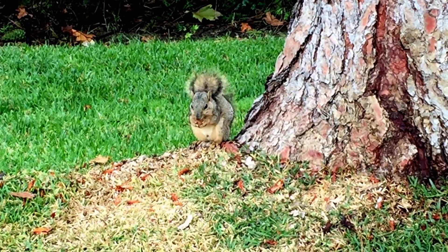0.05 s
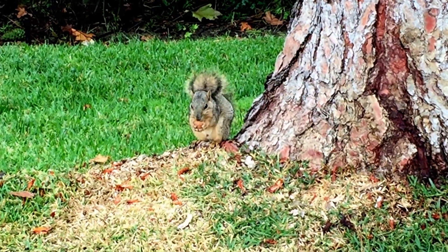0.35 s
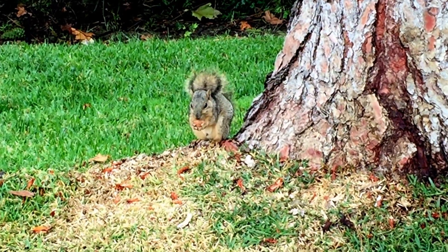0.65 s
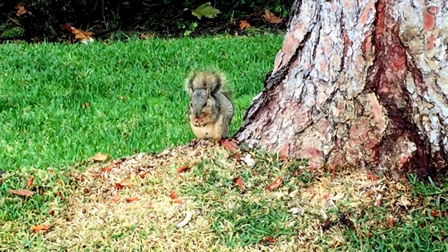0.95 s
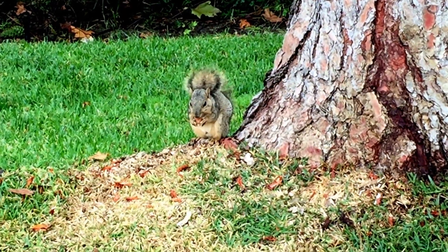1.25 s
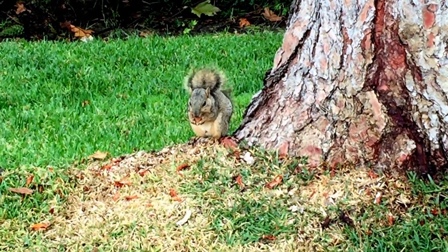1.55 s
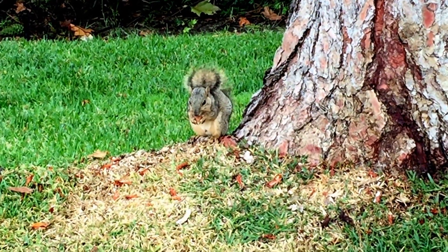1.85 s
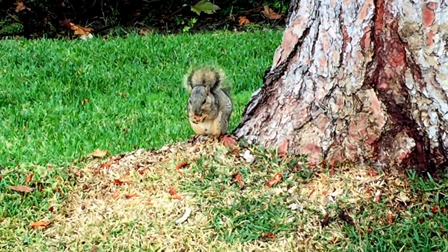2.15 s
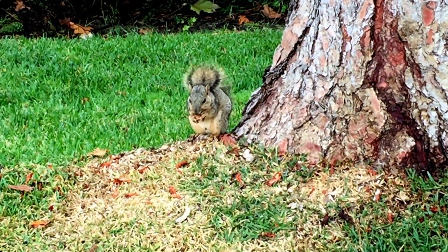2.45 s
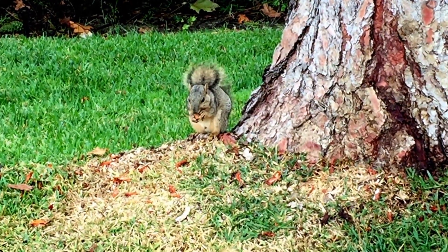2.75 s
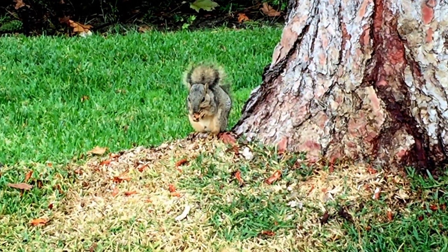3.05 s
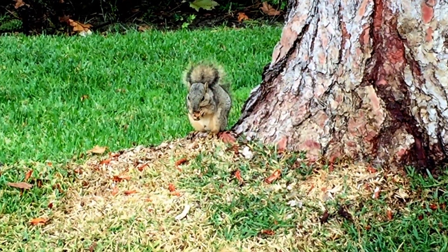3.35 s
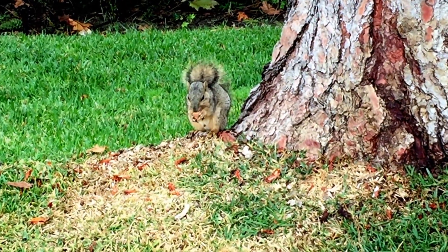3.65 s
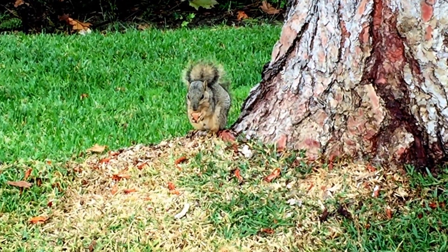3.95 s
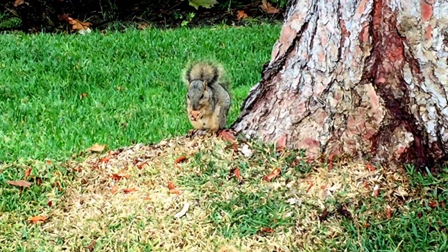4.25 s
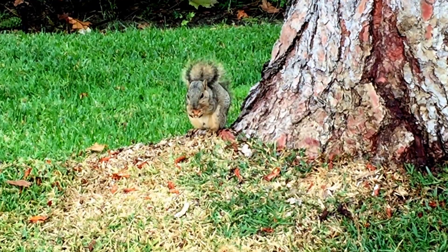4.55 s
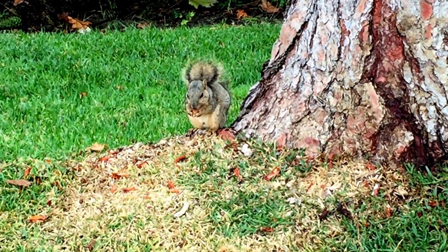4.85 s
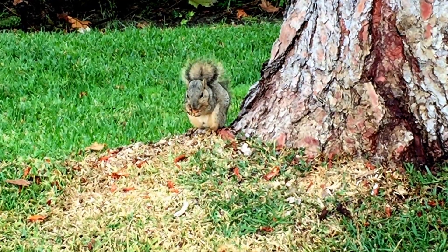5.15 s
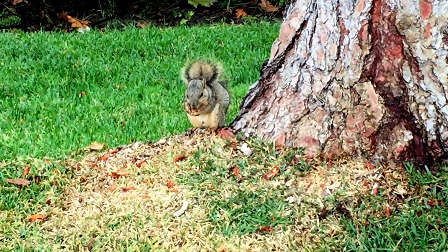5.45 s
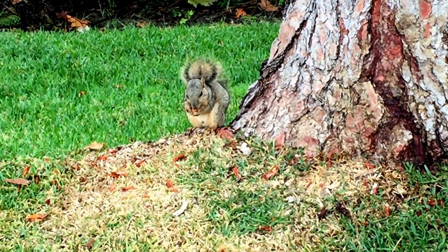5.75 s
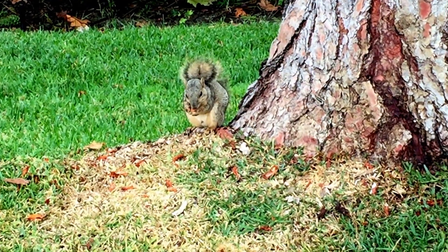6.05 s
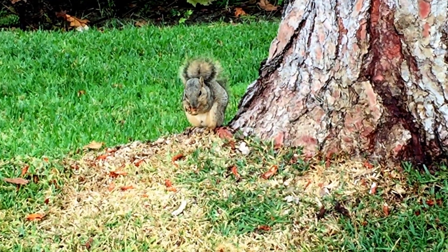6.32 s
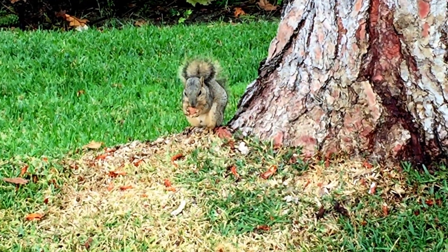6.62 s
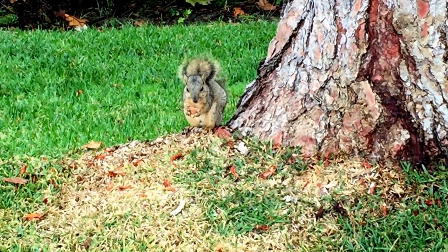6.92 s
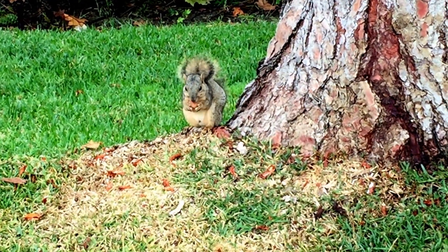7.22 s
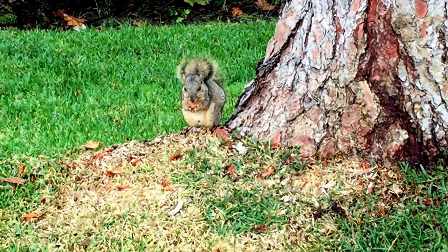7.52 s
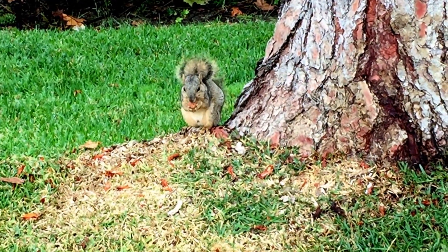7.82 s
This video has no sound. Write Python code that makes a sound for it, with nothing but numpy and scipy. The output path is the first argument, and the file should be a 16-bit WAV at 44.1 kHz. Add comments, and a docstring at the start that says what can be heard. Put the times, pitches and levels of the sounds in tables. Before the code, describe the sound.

Faint, scattered cracks of a squirrel's teeth on a nut shell sit over a soft outdoor wash of faraway traffic. An engine hum rises in pitch, fading in and out, joined about halfway by a very deep engine changing gear. Tyre roar and hiss grow steadily as the vehicle comes along the street, some way from the microphone, and it is nearest at the very end.

```python
"""Squirrel gnawing near a street

A squirrel gnaws on a lawn while distant traffic rumbles and a deep engine works through its gears.
A vehicle speeds up along the street: its engine note climbs, then its tyres swell into a rush as it
comes closer, coloured by sound bouncing off the ground. Now and then the squirrel's teeth crack
a nut, and the shell rings for an instant."""
import sys
import numpy as np
from scipy import signal
from scipy.fft import rfft, irfft
from scipy.io import wavfile
from scipy.ndimage import uniform_filter1d

SR = 44100
rng = np.random.default_rng(int(sys.argv[2]) if len(sys.argv) > 2 else 0)


def persist_wave(psi):
    """Save psi, clipped to +-1, as 16-bit WAV."""
    counts = np.round(np.clip(psi, -1, 1) * 32767).astype(np.int16)
    wavfile.write(sys.argv[1], SR, np.atleast_2d(counts).T)


N = 356328
TIME = np.arange(N) / SR

# A "colour" says how strong the low and high parts of a noise are compared with each other.
# colours of the far traffic and of the street's rumble (frequency [Hz], relative level [dB])
TRAFFIC_COLOUR = [(60, -30), (110, -2), (200, -5.5), (300, -12), (420, -16), (750, -15.5), (1030, -13.5),
                  (1350, -21), (1750, -28), (2300, -34.5), (3200, -37), (4100, -35), (6000, -39),
                  (12000, -40.5), (15800, -43)]
RUMBLE_COLOUR = [(10, -33), (22, -14), (32, -4.5), (44, -5), (56, -3), (80, -6), (105, -7), (150, -26.5),
                 (250, -60.5)]
# how loud the rumble is (time [s], level [dB])
RUMBLE_LEVEL = [(0, -51.5), (1.3, -51.5), (2.05, -48), (2.6, -52), (3.3, -51.5), (3.9, -53), (5.4, -50.5),
                (8.08, -51)]
# a deep engine working through its gears (time [s], pitch [Hz], level [dB])
DEEP_ENGINE = [(4.2, 35, -78), (4.75, 42.87, -55), (5.1, 55.4, -51), (5.55, 52.7, -49.5),
               (6.15, 44.35, -66), (6.48, 55.37, -46.5), (6.8, 61.9, -54), (7.1, 68.2, -50.5),
               (8.08, 85, -59.5)]
# the vehicle's roar when far, approaching and close (frequency [Hz], relative level [dB])
ROAR_FAR = [(80, -7), (160, 1.5), (300, -2.5), (400, -6), (500, -5), (600, -12.5), (780, -5.5),
            (1080, -2.5), (1400, -12), (1750, -11.5), (2200, -23.5), (2600, -23.5), (3500, -43)]
ROAR_APPROACHING = [(80, -11.5), (160, -3.5), (300, -7), (400, -6), (500, -8), (600, -6), (780, -6.5),
                    (1080, -12.5), (1400, -18.5), (1750, -20), (2200, -26.5), (2600, -37), (3500, -55.5)]
ROAR_CLOSE = [(80, -12.5), (160, 0.5), (300, -5), (400, -2.5), (500, -6.5), (600, -7), (780, -3.5),
              (1080, -9.5), (1400, -11.5), (1750, -13.5), (2200, -24), (2600, -37), (3500, -37.5)]
# colour of the tyre hiss (frequency [Hz], relative level [dB])
HISS_COLOUR = [(1200, -9.5), (1800, -2), (2600, -3), (3000, 0.5), (3500, -0.5), (4500, -0.5), (5150, -3),
               (5600, -8), (7400, -5.5), (8500, -7), (9600, -7.5), (10900, -10.5), (13600, -13.5),
               (16000, -15)]
# swells and dips of the hiss, on top of the effect of distance (time [s], level change [dB])
HISS_SWELL = [(2, -4.5), (3, 0), (4.7, -1.5), (5.05, 2.5), (5.5, 4.4), (6.3, -1.7), (6.55, 2), (7.25, 1),
              (7.7, -2.4), (8.08, -0.5)]
# the bounce off the ground (time [s], gap between boosted frequencies [Hz], strength [0-1])
GROUND_BOUNCE = [(5.2, 4140, 0.4), (6.8, 4050, 0.3), (7.5, 4190, 0.3), (8.08, 4450, .34)]
# notes sung by the tyre tread (loudest time [s], half length [s], pitch [Hz], level [dB])
TREAD_NOTES = [(5.85, 0.5, 500, -63), (6.1, 0.59, 216.7, -59), (6.55, 0.57, 458.7, -57),
               (7.1, .3, 504.8, -60)]
# how fast the vehicle's engine fires (time [s], firing rate [Hz])
FIRING_RATE = [(2.2, 85.1), (3.5, 105.5), (4.1, 119.5), (6.5, 168.3), (7.15, 175.4), (7.6, 170)]
# how loud its exhaust note and the octave above are (time [s], level [dB])
EXHAUST_LEVEL = [(2.3, -77), (2.95, -48), (3.08, -59.5), (3.22, -47.5), (3.5, -47.5), (3.6, -53),
                 (3.72, -39), (3.83, -53), (3.92, -40), (4.1, -39.5), (4.4, -59.5), (5.8, -64.5),
                 (6.6, -51), (6.9, -56), (7.15, -49.5), (7.55, -65)]
OCTAVE_LEVEL = [(2.5, -77), (3.45, -59.5), (3.88, -67.5), (4.1, -51), (4.25, -73), (8.08, -70)]
# tones of the engine's drone (pitch [Hz], relative level [dB])
DRONE_TONES = [(122.5, 1.5), (214, -2.5)]
# tones the nut shell rings with (pitch [Hz], relative level [dB], time to fade by 60 dB [s])
SHELL_TONES = [(2389, -5, 0.0046), (4920, 6.5, .003), (5400, -4, 0.0054), (10200, -4, 0.0023),
               (12400, -12, .002), (13600, 0, 0.0033), (14900, -9, 0.0028)]
# cracks made by the teeth (time [s], peak level [dB], boost of the high tones [dB],
# pitch of the lower tones [factor], relative level of the splintering [dB])
CRACKS = [(.0503, -56, -6, 1.2, -9), (.0943, -57, -11, .56, -7), (1.8624, -54, 5, 1.25, -10),
          (1.866, -44.5, 12, 1.17, -4), (2.0134, -41.5, 9.5, 0.98, -11), (2.544, -48, -4, 0.35, -3),
          (2.5658, -54, -5, 0.9, -6), (2.582, -53, 0, 0.42, -3), (2.916, -55.5, -10, 1, -9),
          (3.0563, -52.5, 8, 0.79, -5), (3.061, -56, -8, 1.1, -9), (3.2143, -40.5, -8, 1.2, -10),
          (3.2201, -41, -16, 1.03, -8), (3.223, -51, -14, 0.66, -2), (3.526, -46, 3, 1, -6),
          (3.5323, -55, -12, .95, -3), (5.7335, -43, -23, .8, -9), (6.5081, -35.5, 12, 1.04, -20)]

# the vehicle's path: when it is nearest, how far away the street is, and a steady speed
NEAREST_S, STREET_M, SPEED_M_PER_S = 7.746, 16.15, 9.77


def gain_of(db):
    """Turns decibels into a number to multiply a sound by."""
    return 10 ** (np.asarray(db) / 20)


def evened(x):
    """Scales a signal so that its average size (rms) is 1."""
    return x / np.sqrt(np.mean(x ** 2) + 1e-20)


def colour_at(points, hz):
    """Looks up a colour in dB, joining its points with straight lines on an octave scale."""
    frequencies, db = np.transpose(points)
    return np.interp(np.log(hz + 1), np.log(frequencies + 1), db)


def follow(rows, t=TIME):
    """Looks up each column of a timed table at the times t."""
    times, *columns = np.transpose(rows)
    return [np.interp(t, times, column) for column in columns]


def drift(rate_hz):
    """A smooth random wobble of average size 1; a higher rate wobbles faster."""
    keep_slow = np.exp(-(np.fft.rfftfreq(N, 1 / SR) / rate_hz) ** 2)
    return evened(irfft(rfft(rng.standard_normal(N)) * keep_slow, N))


def grid(size):
    """Times and frequencies for building a sound from overlapping slices, each size samples long."""
    step = size // 4
    return np.arange(N // step + 5)[:, None] * step / SR, np.fft.rfftfreq(size, 1 / SR)


def noise(colour_db, size, patchy_db=1.0):
    """Noise of average size 1 whose colour may change; swirling air makes it patchy."""
    t, hz = grid(size)
    real, imaginary, patches = rng.standard_normal((3, len(t), len(hz)))
    patches = evened(uniform_filter1d(uniform_filter1d(patches, size=14, axis=0), size=12, axis=1))
    colour = gain_of(colour_db)
    colour = colour / np.linalg.norm(colour, axis=-1, keepdims=True)
    slices = (real + 1j * imaginary) * colour * gain_of(patchy_db * patches)
    return evened(signal.istft(slices.T, nperseg=size, noverlap=size - size // 4)[1][:N])


def wavering_tone(hz, waver, flutter_db):
    """A tone whose pitch and loudness wander a little."""
    phase = 2 * np.pi * np.cumsum(hz * (1 + waver * drift(14.42))) / SR
    return np.sqrt(2) * gain_of(flutter_db * drift(23)) * np.sin(phase)


def distance(t=TIME):
    """Metres from the vehicle to the listener."""
    return np.hypot(STREET_M, SPEED_M_PER_S * (t - NEAREST_S))


def distance_gain(loss_db_per_m):
    """Strength compared with the nearest point: sound spreads out, and the lawn soaks it up."""
    return STREET_M / distance() * gain_of(-loss_db_per_m * (distance() - STREET_M))


def distant_traffic(wash_db=-57.5):
    """Faraway tyres make a steady wash over a rumble that rises and falls."""
    _, hz = grid(size=2048)
    wash = noise(colour_at(TRAFFIC_COLOUR, hz), size=2048)
    _, hz = grid(size=8192)
    rumble = noise(colour_at(RUMBLE_COLOUR, hz), size=8192)
    return gain_of(wash_db) * wash + gain_of(follow(RUMBLE_LEVEL)[0]) * rumble


def deep_engine(octave_db=-9):
    """A deep note and its octave rise, sag at a gear change and rise again."""
    hz, level_db = follow(DEEP_ENGINE)
    note = wavering_tone(hz, waver=0.018, flutter_db=1.5)
    octave = wavering_tone(2 * hz, waver=0.018, flutter_db=1.5)
    return gain_of(level_db) * (note + gain_of(octave_db) * octave)


def road_roar(nearest_db=-45.5, close_m=17.3, approaching_m=19.3, far_m=43):
    """The vehicle's tyres and body roar, blending from one colour to the next as it comes closer."""
    t, hz = grid(size=2048)
    closeness = np.interp(distance(t), [close_m, approaching_m, far_m], [2, 1, 0])
    colour_db = sum(np.maximum(1 - abs(closeness - k), 0) * colour_at(colour, hz)
                    for k, colour in enumerate([ROAR_FAR, ROAR_APPROACHING, ROAR_CLOSE]))
    return gain_of(nearest_db) * distance_gain(loss_db_per_m=0.27) * noise(colour_db, size=2048)


def tyre_hiss(base_db=-58, usual_gap_hz=4100, open_s=4.8, opening_s=0.085, dull_db_per_octave=2):
    """Hiss arrives both directly and off the ground, which boosts some frequencies and weakens others."""
    t, hz = grid(size=1024)
    gap_hz, bounce = follow(GROUND_BOUNCE, t)
    bounce_db = 20 * np.log10(abs(1 + bounce * np.exp(-2j * np.pi * hz / gap_hz)))
    # the hiss is dull at first and brightens quickly as the vehicle comes into the open
    hidden = (1 - np.tanh((t - open_s) / opening_s)) / 2
    dull_db = -dull_db_per_octave * hidden * np.log2(np.maximum(hz, 1500) / 5000)
    # more of the highest treble gets through as the distance shrinks
    top_hz = 14300 + 2000 * (STREET_M / distance(t)) ** 6.5
    air_db = -10 * np.log10(1 + (hz / top_hz) ** 22)
    colour_db = colour_at(HISS_COLOUR, hz * usual_gap_hz / gap_hz) + dull_db + air_db + bounce_db
    level = gain_of(base_db + follow(HISS_SWELL)[0]) * distance_gain(loss_db_per_m=0.34)
    return level * noise(colour_db, size=1024, patchy_db=0.86)


def tyre_tread(climb_octaves_per_s=0.09):
    """Tread blocks of uneven length sing rough notes; each swells and fades as its pitch climbs."""
    out = np.zeros(N)
    for loudest_s, half_length_s, hz, db in TREAD_NOTES:
        swell = gain_of(db) * np.exp(-((TIME - loudest_s) / half_length_s) ** 2 / 2)
        pitch_hz = hz * 2 ** (climb_octaves_per_s * (TIME - loudest_s))
        out += swell * wavering_tone(pitch_hz, waver=0.025, flutter_db=2)
    return out


def exhaust(waver=0.0055, flutter_db=1.0, octave_flutter_db=2.5):
    """The round exhaust note climbs as the engine fires faster, fading in and out across the lawn."""
    firing_hz = follow(FIRING_RATE)[0] * (1 + waver * drift(11))
    phase = 2 * np.pi * np.cumsum(firing_hz) / SR
    note = gain_of(follow(EXHAUST_LEVEL)[0] + flutter_db * drift(21)) * np.sin(phase)
    octave = gain_of(follow(OCTAVE_LEVEL)[0] + octave_flutter_db * drift(25)) * np.sin(2 * phase)
    return np.sqrt(2) * (note + octave)


def engine_drone(start_s=7.6, rise_s=0.2, base_db=-46.5, fade_db_per_s=19):
    """Once the vehicle is close, its engine settles into a drone that swells quickly, then fades."""
    tones = sum(gain_of(db) * wavering_tone(hz, waver=0.0113, flutter_db=0.5) for hz, db in DRONE_TONES)
    age = TIME - start_s
    fade_db = fade_db_per_s * np.maximum(age - rise_s, 0)
    return np.clip(age / rise_s, 0, 1) * gain_of(base_db - fade_db) * tones


def squirrel_gnawing(high_above_hz=11000, splinter_fade_s=0.013, attack_s=0.00011):
    """Each crack of the teeth is a burst of splintering that rings the shell for a few milliseconds."""
    out = np.zeros(N)
    t = np.arange(SR // 100) / SR
    hz, db, ring_s = np.transpose(SHELL_TONES)[:, :, None]
    is_high = hz > high_above_hz
    for start_s, peak_db, boost_db, pitch, splinter_db in CRACKS:
        tone_hz = hz * np.where(is_high, 1, pitch)
        ringing = gain_of(db + boost_db * is_high - 60 * t / ring_s) * np.sin(2 * np.pi * tone_hz * t)
        # noise with gently softened treble gives the snap its body
        splinters = signal.lfilter([1], [1, -0.5], rng.standard_normal(len(t)))
        splinters *= gain_of(splinter_db - 60 * t / splinter_fade_s)
        crack = (ringing.sum(0) + splinters) * (1 - np.exp(-t / attack_s))
        slot = out[round(start_s * SR):][:len(t)]
        slot += gain_of(peak_db) * crack[:len(slot)] / abs(crack).max()
    return out


def scene():
    """Adds the street and the squirrel together in one channel."""
    vehicle = road_roar() + tyre_hiss() + exhaust() + engine_drone() + tyre_tread()
    return (distant_traffic() + deep_engine() + vehicle + squirrel_gnawing())[None]


def record(dry):
    """Cuts away the very highest treble."""
    treble_cut = signal.firwin(511, cutoff=15800, window=("kaiser", 9), fs=SR)
    return signal.oaconvolve(dry, treble_cut[None], "same")


dry = scene()
out = record(dry)
persist_wave(out)
```